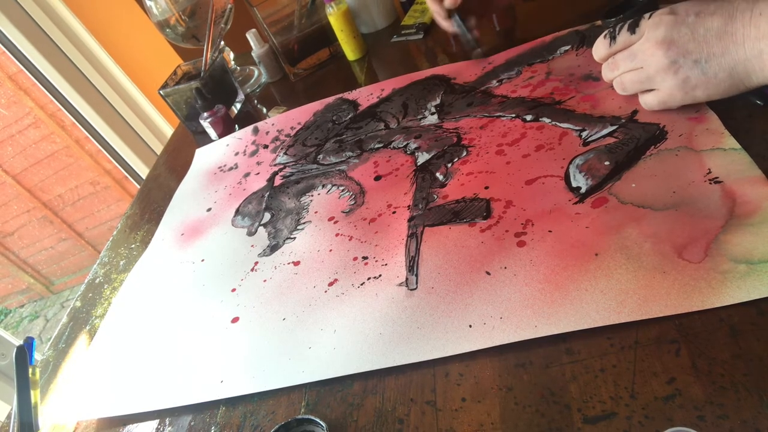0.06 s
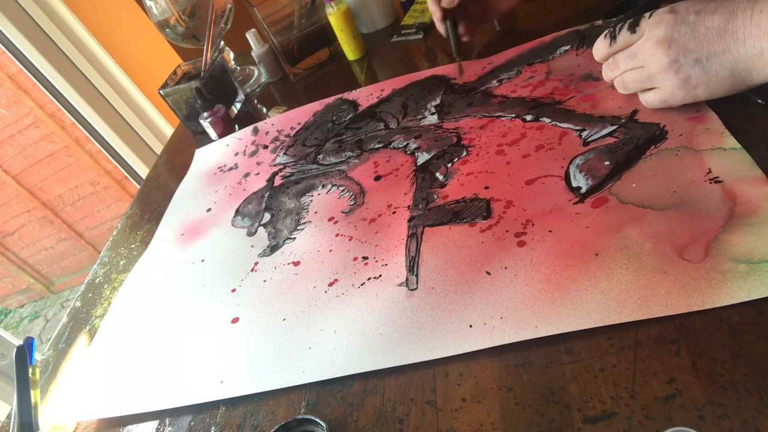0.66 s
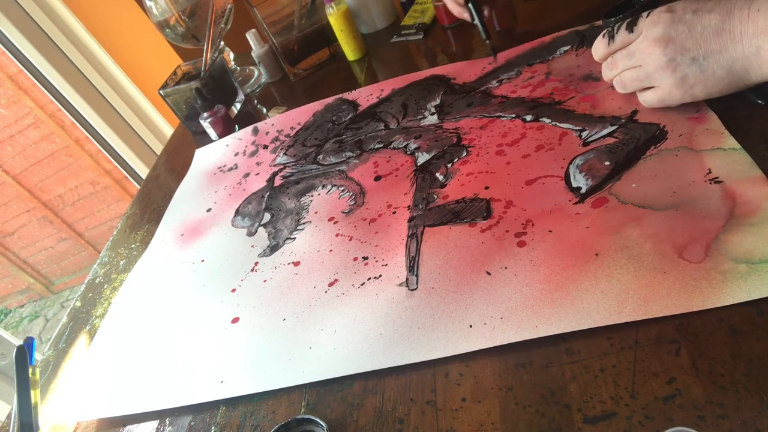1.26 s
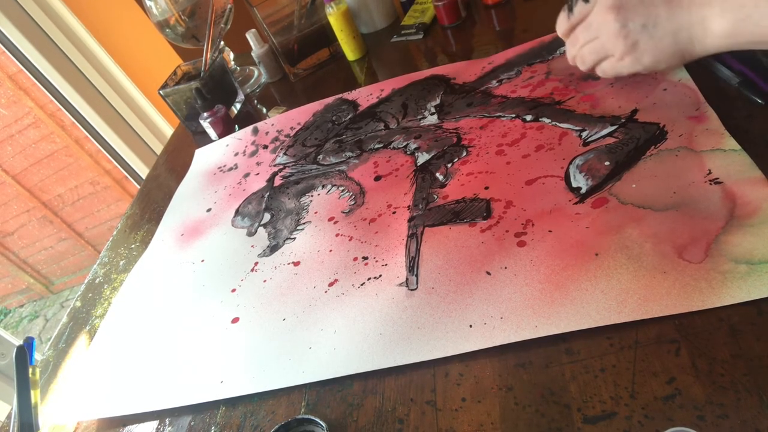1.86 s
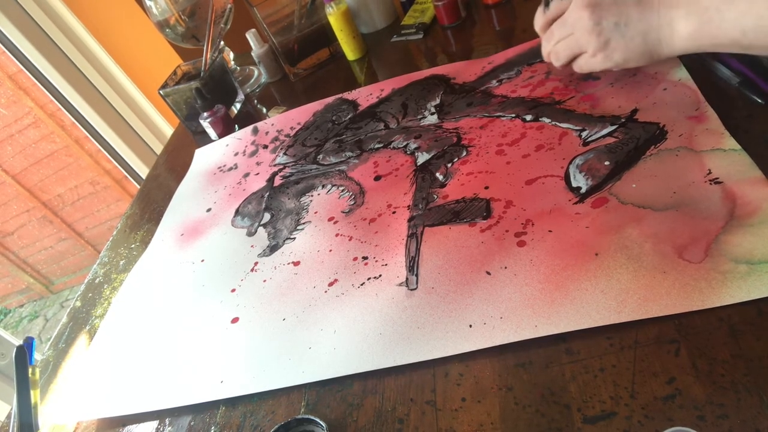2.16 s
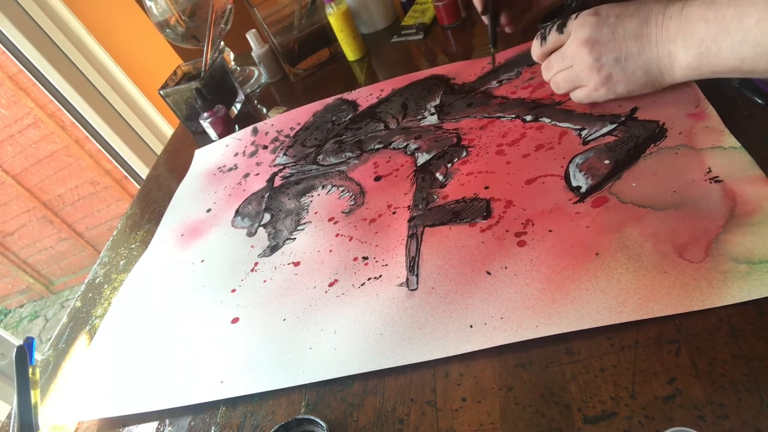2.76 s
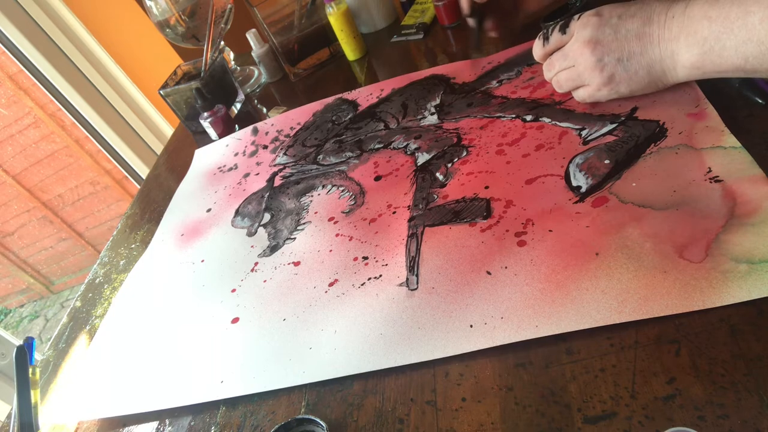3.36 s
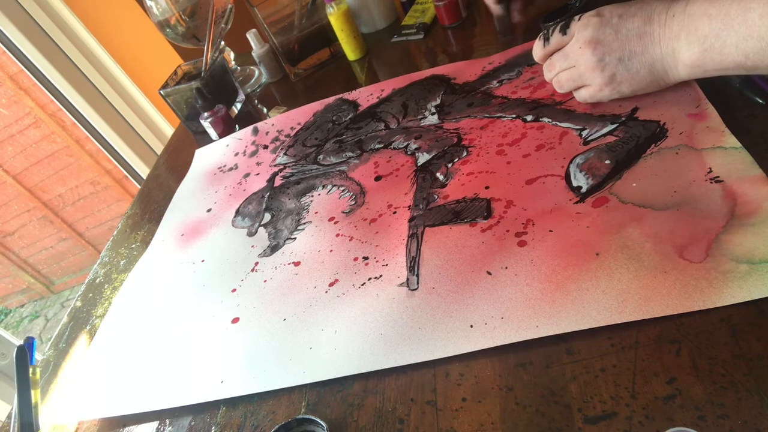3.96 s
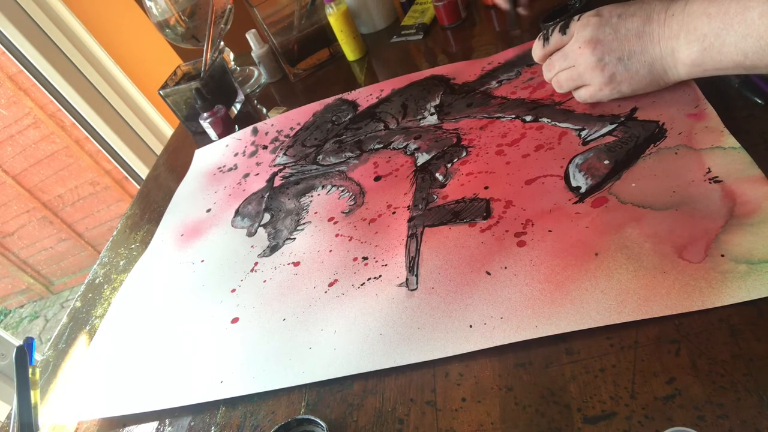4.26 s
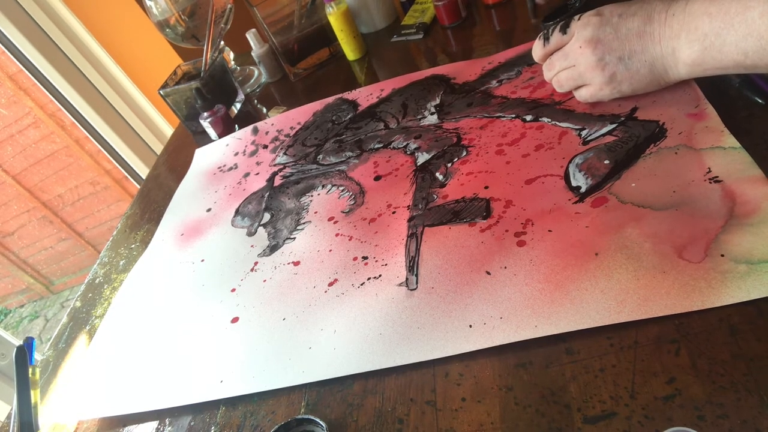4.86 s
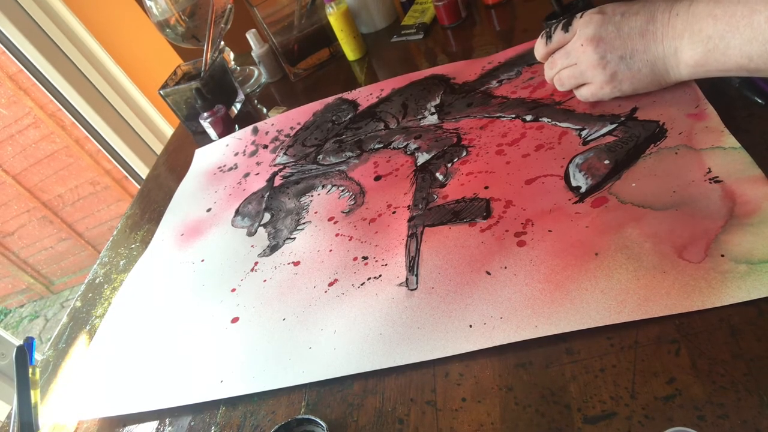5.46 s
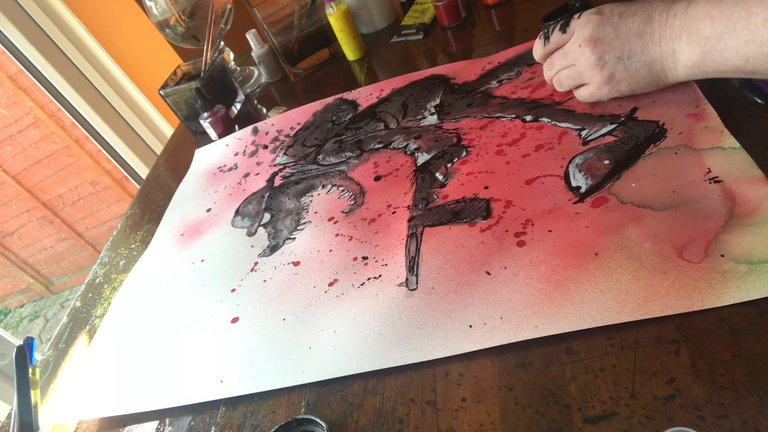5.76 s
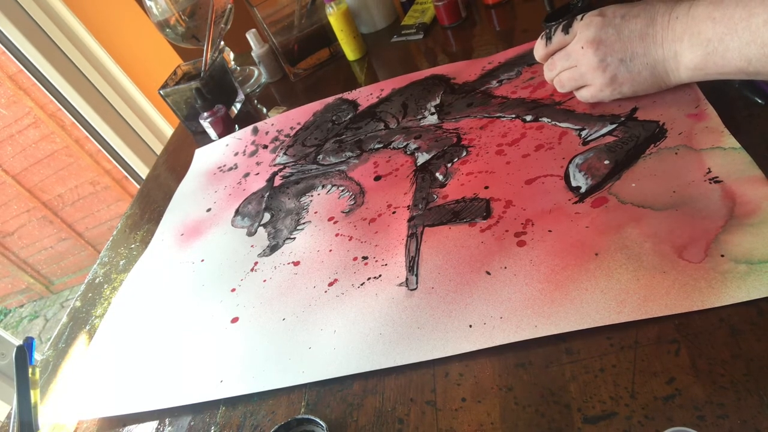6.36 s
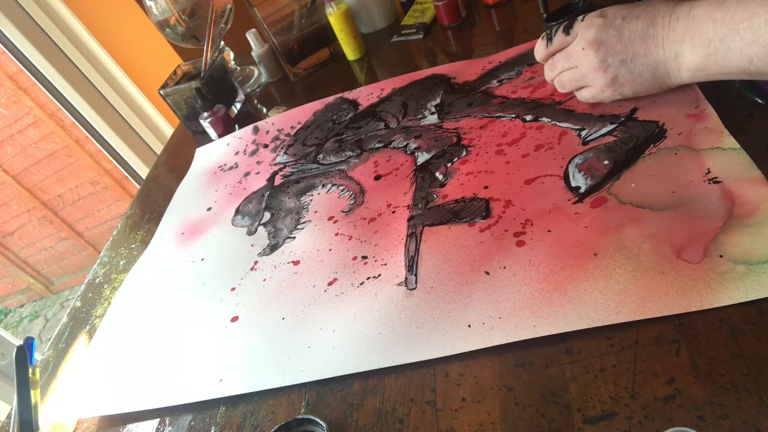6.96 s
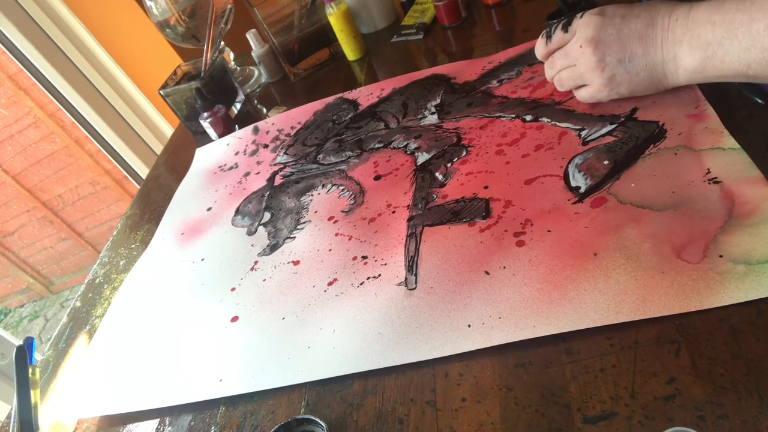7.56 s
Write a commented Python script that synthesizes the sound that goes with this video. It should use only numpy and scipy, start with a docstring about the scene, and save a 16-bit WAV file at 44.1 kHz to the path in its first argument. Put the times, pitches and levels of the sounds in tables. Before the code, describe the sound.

A steel dip pen hatches quick back-and-forth strokes on heavy paper, rasping and ticking while the board beneath drums softly. The first run stops for a pause with a small hollow click. A longer run builds with slight squeaks, then another double click and a few lighter strokes follow. The microphone is close, in a small quiet room with a faint rumble and hum.

```python
"""Dip pen hatching on heavy paper

A small quiet room, one microphone close to a sheet on a board. A steel nib hatches quick strokes:
pulled, it bites early, the sheet rasps and the board drums; pushed back, it swells lightly and flicks off.
It ticks where it lands or catches and may squeak at the crest of a stroke. The resting hand nudges
the board, and a few small hollow clicks sound in the pauses, over a faint rumble and hum."""
import sys
import numpy as np
from scipy import signal
from scipy.fft import rfft, irfft, next_fast_len
from scipy.io import wavfile
from scipy.ndimage import uniform_filter1d, map_coordinates

SR = 44100
rng = np.random.default_rng(int(sys.argv[2]) if len(sys.argv) > 2 else 0)


def digitize_waveform(pressure):
    """Quantize a signal to 16-bit integers and store it at the path in sys.argv[1].

    Rows of a 2-D input are taken as channels; values are limited to [-1, 1].
    """
    field = np.atleast_2d(pressure).T
    bounded = np.clip(field, -1, 1)
    quanta = np.round(bounded * 32767).astype(np.int16)
    wavfile.write(sys.argv[1], SR, quanta)


N = 335812

# room tone spectrum: f/Hz, level/dB
ROOM_TONE = [(20, -60), (31, -33), (45, -13), (62, -3), (100, -4.5), (150, -5), (200, -8), (280, -13.5),
             (450, -21), (650, -21.5), (1500, -23), (3000, -24), (7000, -31), (15700, -38)]
# decay of the room: f/Hz, t60/s
ROOM_DECAY = [(200, 0.41), (600, 0.19), (1500, 0.2), (4000, 0.2), (10000, 0.23), (16000, 0.22)]
# the resting hand shifts on the paper: middle t/s, half length/s, level/dB
HAND_SHIFTS = [(.65, 0.39, -59), (2.77, .2, -61), (3.296, 0.065, -59), (3.688, 0.1, -58), (4.1, 0.37, -67),
               (6.177, .14, -67), (7.044, .12, -67)]
# small hollow clicks: t/s, level/dB, rise/s, t60/s, treble/dB
HOLLOW_CLICKS = [(2.022, -43, 0.00031, 0.016, -5), (2.061, -45.5, 0.012, 0.084, 3),
                 (2.085, -53.5, .001, 0.14, 15), (5.458, -37.5, 0.00043, 0.03, -8.5),
                 (5.5235, -44, 0.00069, 0.057, 5)]
# resonances of the hollow, the board, the sheet and the nib: f/Hz, width/Hz, level/dB
HOLLOW_MODES = [(1215, 150, -6.5), (1402, 40, 3.5), (1480, 57, -8), (1850, 120, -15), (2680, 145, -8),
                (3400, 370, -25.5), (4250, 250, -13), (4660, 110, -14), (6170, 470, -9.5),
                (8300, 550, -14.5), (11150, 600, -18.5), (14100, 1000, -16.5)]
BOARD_MODES = [(182, 16, -6), (223, 14, -2.5), (264.3, 16.6, 2.5), (287.4, 29, -3.5), (323.4, 20.5, -3),
               (429, 21, -8.5)]
SHEET_MODES = [(562, 120, -0.5), (640, 160, -0.5), (720, 39, -6.5), (876, 100, -12.5), (1103, 75, -1.5),
               (1333, 126, 1), (1572, 135, 1.5), (1780, 73, -27.5)]
NIB_MODES = [(2040, 91, -2), (2310, 67, 0), (3020, 150, -1), (3360, 96, 0.5), (5230, 390, 4),
             (6160, 220, -7)]
# spectra of the nib's hiss and of the finest fibres' fizz: f/Hz, level/dB
HISS_SPECTRUM = [(900, -54), (1600, 7), (2000, 5), (3000, 1.5), (4200, 0), (5500, -0.5), (7000, 0),
                 (8200, -3.5), (10500, -19.5)]
FIZZ_SPECTRUM = [(5500, -36.5), (8000, -6), (9500, -3.5), (10600, -2.5), (11600, 2.5), (12500, -0.5),
                 (14000, 1), (15600, 2)]
# how the pen is held: t/s, weight on sheet and board/dB, colour that its angle brings out f/Hz
PEN_HOLD = [(0, -0.5, 3340), (.7, 3.5, 3230), (1.26, 4, 3800), (2.78, 8, 3080), (3.0, -14.5, 4200),
            (3.42, 0, 4360), (3.72, -5, 4300), (3.9, 8, 3960), (4.08, -3.5, 4800), (4.62, -3.5, 5700),
            (4.72, 1.5, 5650), (4.82, -5, 5130), (4.9, 1.5, 4100), (6.25, 2, 4800), (6.6, -3, 4260),
            (6.8, 6, 3240)]
# the nib lands or catches: t/s, tick/dB, knock on the board/dB, hardness as fizz over tick/dB
NIB_TAPS = [(.022, -53, -43.5, -2), (0.1021, -38, -36, -3), (0.1252, -47, -42.5, -15),
            (0.381, -43.5, -39.5, -22), (0.3549, -65, -40.5, -10), (0.5576, -44, -33, -13),
            (0.609, -42.5, -46, 4), (.651, -47, -69, 9.5), (.696, -47.5, -48, 6), (0.7192, -50, -29.5, -10),
            (.754, -51, -37, -16), (.8022, -43.5, -37.5, 1), (.838, -54, -44, 10), (0.9711, -43, -43, 1),
            (1.0641, -50.5, -44, -5), (1.265, -48.5, -51, 1.5), (1.6302, -67, -53, -10),
            (2.5448, -57.5, -44, -18), (2.6824, -56, -52, -3), (2.741, -56, -42, 0.5), (3.28, -57, -50, -5),
            (3.6551, -37.5, -32.5, 6), (3.678, -49, -45.5, -9), (3.824, -51, -46, -12),
            (3.9739, -49.5, -45.5, -10), (4.0114, -40, -52, 0.5), (4.221, -46.5, -44, -9),
            (4.2669, -47, -45.5, 8.5), (4.463, -47, -47, 9), (4.5407, -47.5, -48, -6),
            (4.6507, -54, -55, 9), (4.7193, -50, -51, 3), (4.771, -51, -33, 12.5), (4.822, -48, -55, 5),
            (6.076, -65, -44, -11), (6.114, -51, -45.5, -4), (6.2429, -44.5, -47.5, -10),
            (6.436, -41, -45.5, -3), (6.596, -39.5, -48.5, 5), (6.983, -54, -48, 1)]
PULL, PUSH = 0, 1
# a pulled and a pushed stroke: share of length before the crest, share of full pressure at landing,
# board/dB, sheet/dB, fizz/dB, squeak/dB
STROKE_KINDS = [(.3, 0.54, 0.5, -2, -2.5, 5), (.65, 0.61, -5.5, -7, -4, 9)]
PEN_STROKES = [(.043, 0.068, -44.5, PULL, None), (0.173, 0.038, -59, PULL, None),
               (.198, 0.029, -52, PUSH, 2960), (0.281, 0.086, -45.5, PULL, None),
               (0.38, 0.057, -58, PUSH, None), (.489, 0.085, -46, PULL, None),
               (0.602, 0.067, -51, PUSH, 4760), (0.691, 0.063, -44.5, PULL, None),
               (.804, 0.045, -49, PUSH, None), (.871, 0.066, -47.5, PULL, None),
               (0.968, 0.063, -52, PUSH, None), (1.06, 0.03, -56, PULL, None),
               (1.26, 0.038, -61.5, PULL, None), (2.669, 0.12, -75, PULL, None),
               (2.796, 0.08, -70, PUSH, None), (2.893, .057, -66.5, PULL, None),
               (2.97, 0.082, -62.5, PUSH, 4970), (3.059, 0.086, -59, PULL, 4300),
               (3.151, 0.081, -59.5, PUSH, None), (3.262, 0.069, -54, PUSH, 3620),
               (3.343, .075, -58, PUSH, None), (3.423, 0.079, -52, PULL, 5100),
               (3.533, .07, -61, PUSH, None), (3.608, 0.032, -49.5, PULL, 5000),
               (3.714, 0.041, -57.5, PUSH, 3970), (3.775, 0.079, -51.5, PULL, 5070),
               (3.896, 0.052, -60.5, PUSH, None), (3.974, 0.061, -51.5, PULL, None),
               (4.079, .056, -55.5, PUSH, 4100), (4.154, .082, -47, PULL, None),
               (4.267, 0.063, -51, PUSH, None), (4.349, 0.059, -45.5, PULL, None),
               (4.464, 0.047, -52.5, PUSH, None), (4.541, 0.054, -49, PULL, None),
               (4.646, 0.051, -52, PUSH, None), (4.718, 0.077, -46.5, PULL, None),
               (4.826, 0.064, -53, PUSH, None), (4.896, 0.072, -48, PULL, None),
               (4.937, 0.035, -53, PUSH, 3400), (6.144, 0.073, -71, PUSH, None),
               (6.24, 0.058, -56, PULL, None), (6.45, 0.024, -62, PULL, None),
               (6.697, 0.098, -72.5, PUSH, 3270), (6.814, 0.043, -65.5, PULL, None),
               (6.854, 0.05, -61, PUSH, None), (6.946, 0.063, -68, PUSH, None)]


def amp(db):
    """Decibels to gain."""
    return 10 ** (np.asarray(db) / 20)


def unit(x):
    """x at rms 1."""
    return x / np.sqrt(np.mean(x ** 2) + 1e-20)


def along(points, hz):
    """(f/Hz, value) points read on a log frequency axis."""
    freqs, values = np.transpose(points)
    return np.interp(np.log(hz + 1), np.log(freqs), values)


def resonances(modes, hz):
    """Gain of a set of resonances whose powers add."""
    return np.sqrt(sum(amp(db) ** 2 * (hz * width) ** 2 / ((f * f - hz * hz) ** 2 + (hz * width) ** 2)
                       for f, width, db in modes))


def band(hz, low_hz, high_hz, order=4):
    """Gain of a band-pass with steep skirts."""
    return 1 / np.sqrt((1 + (low_hz / (hz + 1)) ** (2 * order)) * (1 + (hz / high_hz) ** (2 * order)))


def ring(x, gain, size=8192):
    """x through a causal filter of unit energy, shaped like this gain curve."""
    curve = gain(np.fft.rfftfreq(size, 1 / SR))
    cepstrum = irfft(np.log(np.maximum(curve / curve.max(), 1e-6)))
    response = irfft(np.exp(rfft(2 * cepstrum[:size // 2], size)))
    return signal.fftconvolve(x, response / np.linalg.norm(response))[:len(x)]


def snaps(per_second, spread_db, size):
    """Tiny impulses at random moments and strengths, as when fibres snap past the nib."""
    hit = rng.random(size) < per_second / SR
    sign = rng.choice([-1, 1], size)
    strength = amp(spread_db * np.clip(rng.standard_normal(size), -2, 2))
    return unit(hit * sign * strength)


def room_tone(air_db=-65, hum_db=-77, hum_hz=97):
    """The room's low rumble and faint hiss, with a wavering hum."""
    air = ring(rng.standard_normal(N), lambda hz: amp(along(ROOM_TONE, hz)))
    hum = ring(rng.standard_normal(N), lambda hz: resonances([(hum_hz, 6, 0)], hz) * band(hz, 62, 140))
    return amp(air_db) * unit(air) + amp(hum_db) * unit(hum)


def room_tail(x, gap_s=0.003):
    """Table and near walls send a short diffuse tail to the microphone."""
    hz, t, noise = signal.stft(rng.standard_normal(SR // 2), SR, nperseg=256)
    tail = signal.istft(noise * amp(-60 * t / along(ROOM_DECAY, hz)[:, None]), SR, nperseg=256)[1]
    tail = np.pad(tail / np.linalg.norm(tail), (int(gap_s * SR), 0))
    return signal.fftconvolve(x, tail)[:N]


def resting_hand():
    """As it shifts, the resting hand nudges the board's lowest resonances."""
    t = np.arange(N) / SR
    effort = sum(amp(db) * np.exp(-((t - middle) / half) ** 2) for middle, half, db in HAND_SHIFTS)
    nudges = effort * snaps(200, 4.3, N)
    return ring(nudges, lambda hz: resonances(BOARD_MODES, hz) * band(hz, 133, 199, order=3))


def hollow_clicks(treble_hz=4000):
    """Short crackles ring a small hollow."""
    out = np.zeros(N + SR)
    t = np.arange(-SR // 10, SR // 4) / SR
    hollow = lambda hz: resonances(HOLLOW_MODES, hz) * band(hz, 490, 17000, order=3)
    for at, db, rise, t60, treble_db in HOLLOW_CLICKS:
        envelope = np.exp(np.minimum(t, 0) / rise) * amp(-60 * np.maximum(t, 0) / t60)
        crackle = envelope * snaps(8000, 3.7, len(t))
        shelf = lambda hz: amp(treble_db * hz ** 2 / (hz ** 2 + treble_hz ** 2))
        out[int((at + t[0]) * SR):][:len(t)] += amp(db) * ring(crackle, lambda hz: hollow(hz) * shelf(hz))
    return out[:N]


def squeaks(width_share=0.14, octave_db=-12, half_length_share=0.16):
    """At the crest of some strokes, fast uneven slips ring the tines in a narrow band and its octave."""
    out = np.zeros(N + SR)
    t = np.arange(-SR // 10, SR // 10) / SR
    for start, length, db, direction, squeak_hz in PEN_STROKES:
        if squeak_hz is None:
            continue
        crest, *_, squeak_db = STROKE_KINDS[direction]
        at = start + crest * length
        width_hz = width_share * squeak_hz
        modes = [(squeak_hz, width_hz, 0), (2 * squeak_hz, 2 * width_hz, octave_db)]
        tines = lambda hz: resonances(modes, hz) * band(hz, squeak_hz / 2, 2 * squeak_hz, order=3)
        squeak = unit(ring(snaps(9000, 0.61, len(t)), tines, size=1024))
        envelope = np.exp(-2 * (t / (half_length_share * length)) ** 2)
        out[int((at + t[0]) * SR):][:len(t)] += amp(db + squeak_db) * envelope * squeak
    return out[:N]


def hold(at):
    """The hand's weight/dB and the nib's colour f/Hz at this moment."""
    times, *columns = np.transpose(PEN_HOLD)
    return [np.interp(at, times, column) for column in columns]


def pen_angle(x, colour_hz, boost_db, log_width):
    """The angle of the pen brings out one region of its sound."""
    bump = lambda hz: amp(boost_db * np.exp(-0.5 * (np.log((hz + 1) / colour_hz) / log_width) ** 2))
    return ring(x, bump, size=1024)


def nib_travel(x, patchy_db=2.5):
    """As the nib travels over the sheet, single resonances swell and fade."""
    spectra = signal.stft(x, nperseg=512)[2]
    patches = rng.standard_normal(spectra.shape)
    for _ in range(2):
        patches = uniform_filter1d(uniform_filter1d(patches, size=5, axis=0), size=3, axis=1)
    return signal.istft(spectra * unit(amp(patchy_db * unit(patches))), nperseg=512)[1][:N]


def tap_forces(crack_t60=0.022, push_db=21, crack_db=20):
    """Each contact gives the board one push, and sheet, nib and finest fibres a short crack."""
    force = np.zeros((4, N + SR))
    t = np.arange(-SR // 200, SR // 20) / SR
    push = amp(push_db) * (t == 0)
    for at, tick_db, knock_db, hard_db in NIB_TAPS:
        sheet_db = tick_db + 0.19 * (knock_db - tick_db) - 2.5  # the sheet's flex follows tick and knock
        gains = amp([knock_db, sheet_db, tick_db, tick_db + hard_db])
        burst = rfft(rng.standard_normal(len(t)) * (t >= 0) * amp(-60 * abs(t) / crack_t60))
        # a hard contact excites all frequencies alike
        crack = irfft(burst / np.abs(burst), len(t)) * (t >= 0)
        crack *= amp(crack_db) / np.linalg.norm(crack)
        tick = pen_angle(crack, hold(at)[1], boost_db=6.5, log_width=0.4)
        force[:, int((at + t[0]) * SR):][:, :len(t)] += gains[:, None] * [push, crack, tick, crack]
    return force[:, :N]


def pressure(t, rise, fall, landing, touch_s=0.003):
    """The nib lands within a few milliseconds, bears down, then lifts."""
    ramp = lambda time, length: np.clip(time / max(length, touch_s), 0, 1)
    bearing = landing + (1 - landing) * np.sin(np.pi / 2 * ramp(t, rise)) ** 2
    lift = np.sin(np.pi / 2 * ramp(rise + fall - t, fall))
    return ramp(t, touch_s) * bearing * lift


def stroke_forces(board_lag_s=0.0075, sheet_lag_s=0.0016, tooth_db=1, tooth_per_second=350):
    """Friction of the sliding nib drives board, sheet, nib and the finest fibres."""
    force = np.zeros((4, N + SR))
    size = SR // 4
    t = np.arange(size) / SR
    for start, length, db, direction, _ in PEN_STROKES:
        crest, landing, board_db, sheet_db, fizz_db, _ = STROKE_KINDS[direction]
        rise, fall = crest * length, (1 - crest) * length
        weight_db, colour_hz = hold(start)
        # the paper's tooth makes the grip flutter
        tooth = map_coordinates(rng.standard_normal(size // 16), [t * tooth_per_second])
        flutter = unit(amp(tooth_db * tooth))
        grip = lambda lag: amp(db) * pressure(t - lag, rise, fall, landing) * flutter
        fibres = snaps(7500, 4.1, size)
        # the deeper parts answer later, once the nib has dug in
        board = amp(board_db + weight_db) * grip(board_lag_s) * snaps(2500, 0.49, size)
        sheet = amp(sheet_db + 0.7 * weight_db) * grip(sheet_lag_s) * fibres
        nib = grip(0) * pen_angle(fibres, colour_hz, boost_db=4.5, log_width=0.47)
        bright_db = 0.5 * np.log2(colour_hz / 4200)  # a brighter pen angle brings out more fizz
        fizz = amp(fizz_db + bright_db) * grip(0) * snaps(9000, 4.3, size)
        force[:, int(start * SR):][:, :size] += [board, sheet, nib, fizz]
    return force[:, :N]


def pen():
    """Strokes and taps ring board, sheet and nib: a low drumming and the scratch above it."""
    board, sheet, nib, fizz = stroke_forces() + tap_forces()
    drum = ring(board, lambda hz: resonances(BOARD_MODES, hz) * band(hz, 174, 457, order=9))
    rasp = ring(sheet, lambda hz: resonances(SHEET_MODES, hz) * band(hz, 370, 1540))
    hiss = ring(nib, lambda hz: amp(along(HISS_SPECTRUM, hz)) * (1 + resonances(NIB_MODES, hz)))
    sizzle = ring(fizz, lambda hz: amp(along(FIZZ_SPECTRUM, hz)))
    return drum, nib_travel(rasp + hiss + sizzle)


def scene(direct_db=-0.7, room_db=-5, drum_room_db=-9):
    """One close microphone feeds both channels; the board's drumming reaches it mostly direct."""
    drum, scratch = pen()
    near = scratch + squeaks() + hollow_clicks()
    tail = room_tail(amp(room_db) * near + amp(drum_room_db) * drum)
    mono = drum + resting_hand() + amp(direct_db) * near + tail + room_tone()
    return np.array([mono, mono])


def record(dry, top_hz=15850):
    """The camera keeps nothing above its band limit."""
    size = next_fast_len(N + SR // 2)
    passband = np.fft.rfftfreq(size, 1 / SR) < top_hz
    return irfft(rfft(dry, size) * passband, size)[:, :N]


dry = scene()
out = record(dry)
digitize_waveform(out)
```